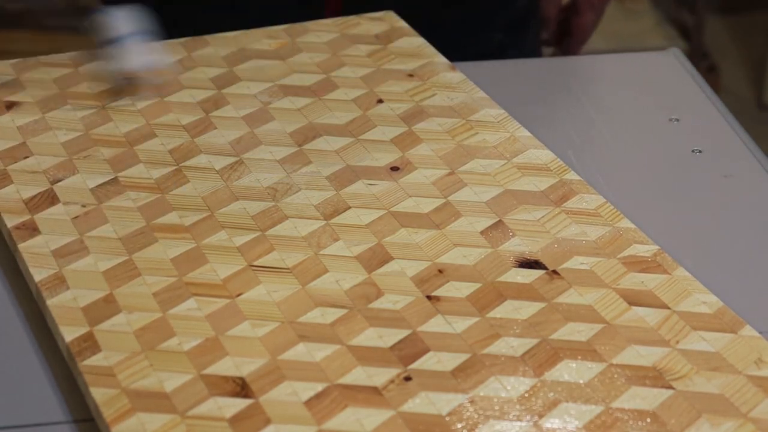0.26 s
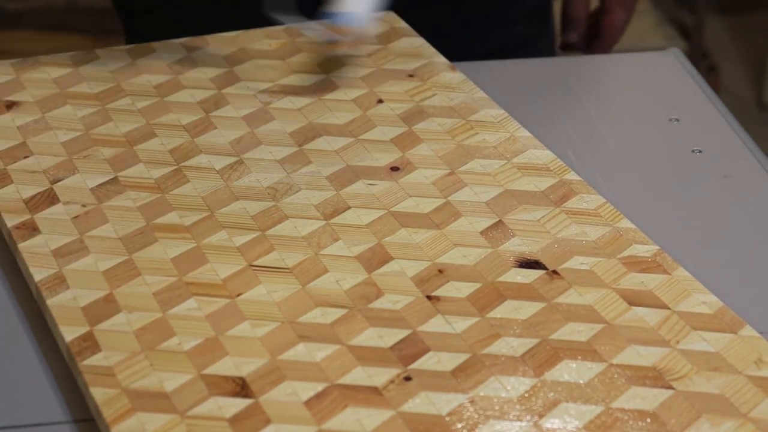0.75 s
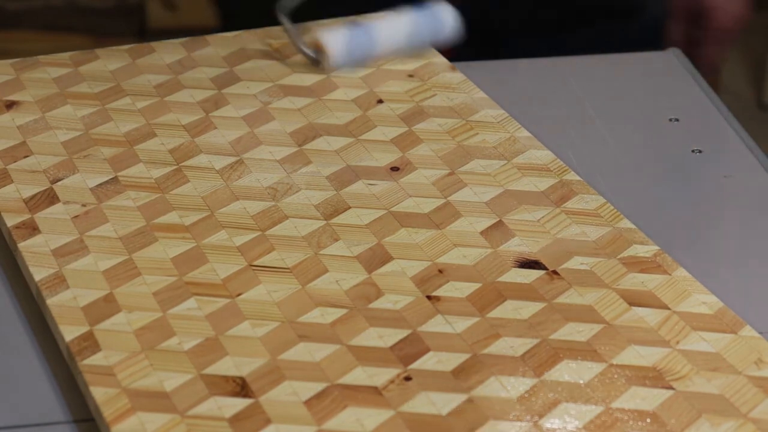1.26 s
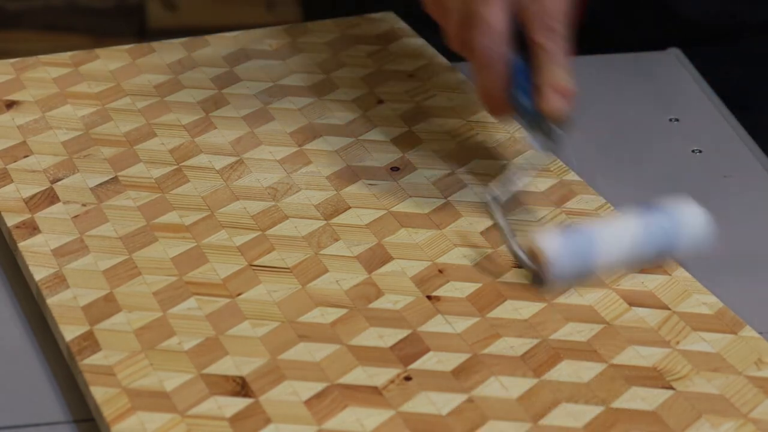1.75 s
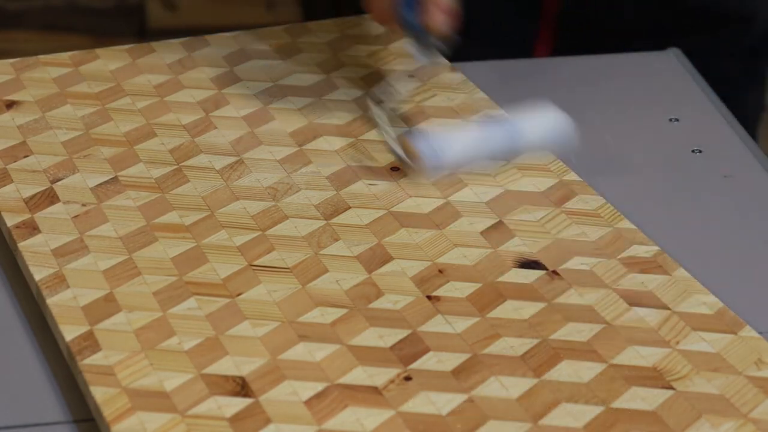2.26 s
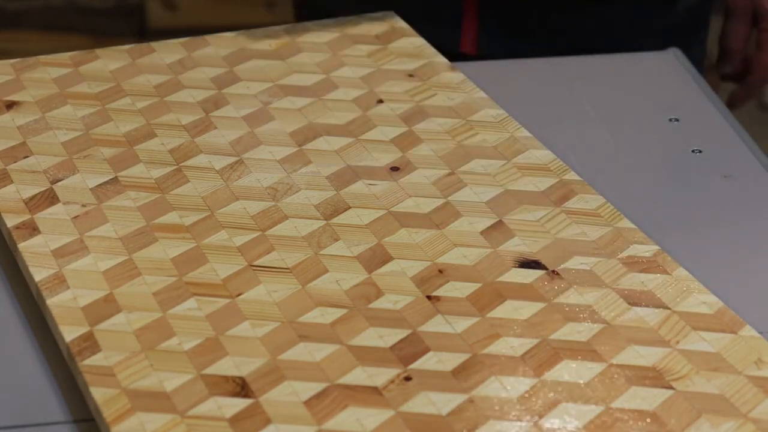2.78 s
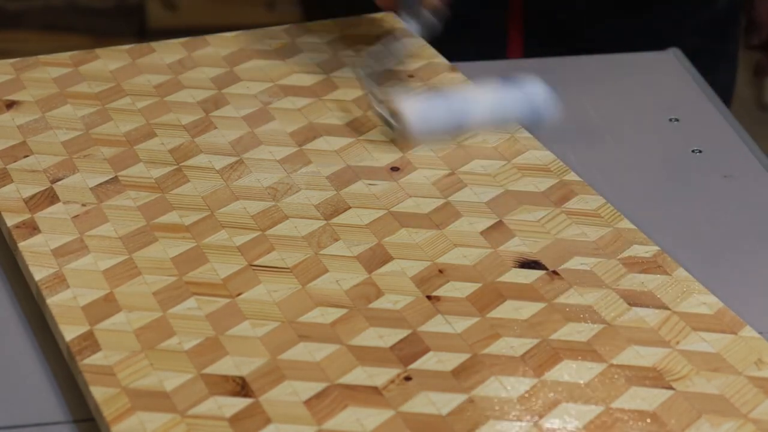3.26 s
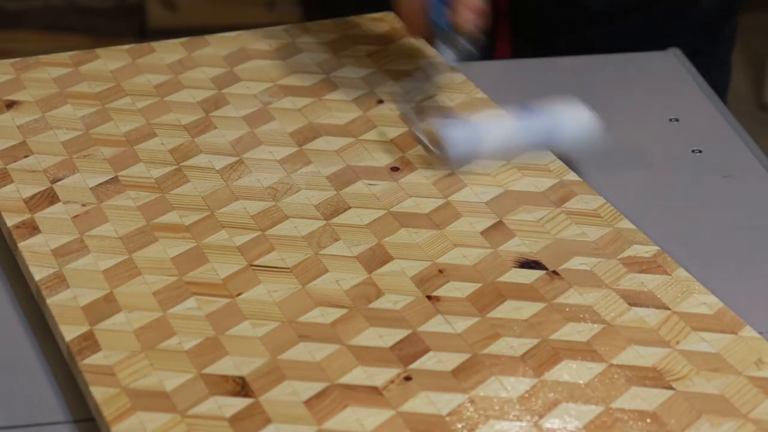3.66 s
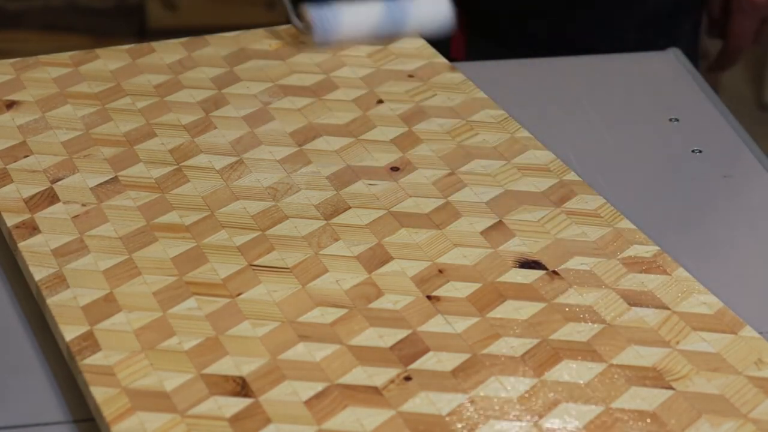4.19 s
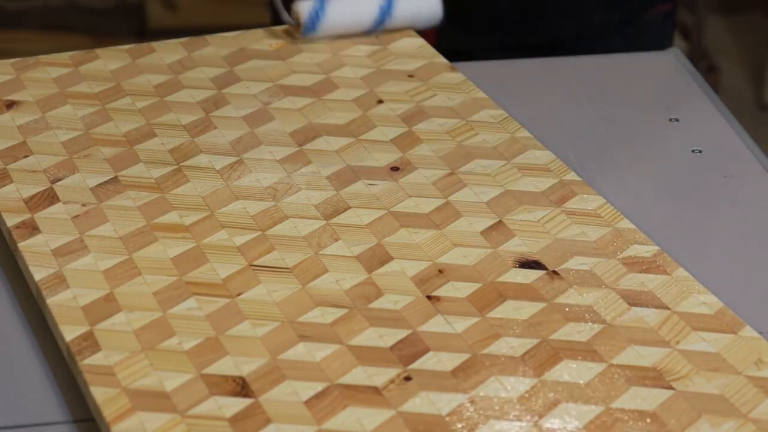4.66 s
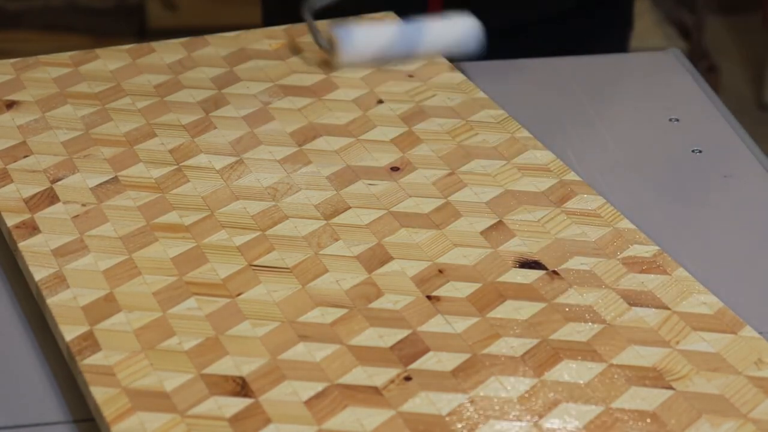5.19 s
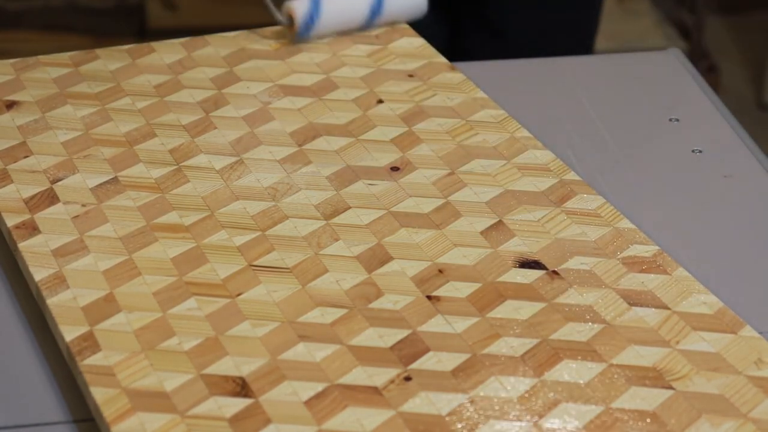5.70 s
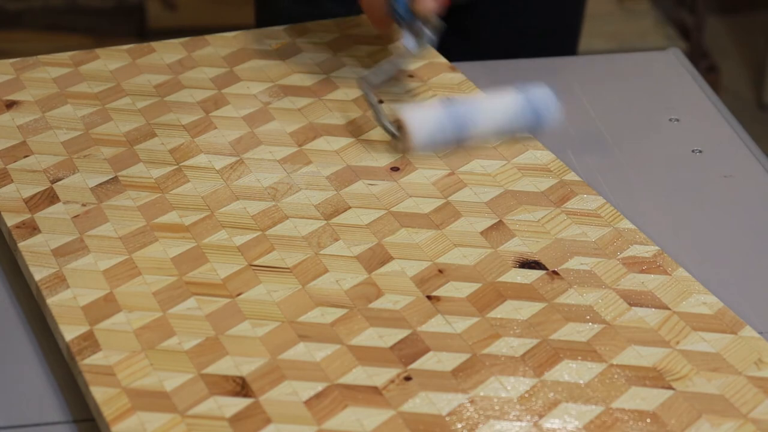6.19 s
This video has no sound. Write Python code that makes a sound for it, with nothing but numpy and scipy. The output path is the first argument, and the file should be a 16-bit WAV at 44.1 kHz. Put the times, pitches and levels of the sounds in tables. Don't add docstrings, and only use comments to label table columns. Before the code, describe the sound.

Sticky, fizzing roller strokes spread finish on wood, fading to softer rubs with metallic clicks and a dull board bump above a low drone.

```python
import sys
import numpy as np
from scipy import signal
from scipy.fft import rfft, irfft
from scipy.io import wavfile
from scipy.ndimage import uniform_filter1d, map_coordinates

SR = 44100
rng = np.random.default_rng(int(sys.argv[2]) if len(sys.argv) > 2 else 0)


def int16_out(signal):
    q = np.round(np.clip(np.atleast_2d(signal).T, -1, 1) * 32767)
    wavfile.write(sys.argv[1], SR, q.astype(np.int16))


def amplitude_ratio(level_db):
    exponent = np.asarray(level_db, float) / 20
    return 10 ** exponent


N = 284004
TIME = np.arange(N) / SR

# time_s, fan_db, floor_rumble_db
HUM_LEVELS = [(0.0, -33, -40), (0.7, -32, -46), (1.1, -32.5, -54), (2.4, -32.5, -47), (3.7, -32.5, -51),
              (4.4, -33.5, -54), (4.8, -33.5, -56), (5.0, -32, -46), (5.8, -32, -44), (6.44, -31.5, -41)]
# pitch_hz, level_db
FAN_COLOUR = [(24, -53), (40, -22.5), (85, -15), (150, -2.5), (198, 1), (360, -6.5), (408, -9.5),
              (451, -12), (930, -15.5), (1320, -25.5), (2170, -37.5), (3960, -52), (9250, -52),
              (14500, -50.5), (15600, -56)]
# pitch_hz, width_hz, level_over_wash_db
DUCT_RESONANCES = [(88, 68, -4.5), (137, 6.8, 9.5), (188.3, 29.4, 3.5), (330, 24, 2.5), (398, 9.1, 6),
                   (490, 6.8, 5.5), (565.6, 17, 2)]
# pitch_hz, level_db
RUMBLE_COLOUR = [(10, -16), (22, -10), (30, -4), (40, -13), (60, 11), (95, 18), (130, -18), (200, -46)]
# strongest_s, rise_s, fall_s, level_db
FLOOR_THUDS = [
    (3.12, 0.063, .3, -41),
    (3.73, 0.064, .12, -46),
    (5.03, 0.14, .3, -46),
    (5.95, .15, .4, -62),
]
# pitch_hz, level_db
THUD_COLOUR = [(10, -14), (22, 2), (35, 10), (60, -11), (95, 10), (130, -18), (200, -36)]
# pitch_hz, likeness_0_to_1
LIKENESS = [(25, .99), (60, .975), (290, .95), (640, .78), (1400, .4), (3000, .15), (15000, .05)]
# pitch_hz, left_minus_right_db
HUM_LEAN = [(60, -1.2), (700, -2), (2000, 0.5), (15000, -1)]
# pitch_hz, level_db
MOTOR_TONES = [(193.8, -45), (312.2, -46), (403.7, -44), (855.9, -75), (931.3, -59.5), (3343, -89)]
# fastest_s, speeding_up_s, slowing_down_s, peeling_fizz_db, rubbing_db
STROKES = [(0.042, .2, .15, -39.5, -34.5), (0.32, .2, .13, -42, -37.5), (0.5, .075, .265, -38, -35),
           (1.1, .6, .45, -65, -50), (1.72, .42, .345, -49.5, -49), (2.3, .22, .54, -47, -47.5),
           (3.048, .008, .06, -60, -46), (3.385, .285, .264, -49, -46.5), (3.80, .17, .39, -47.5, -47),
           (4.17, .12, .12, -64, -56), (4.385, .16, .16, -54, -50.5), (4.666, .137, .17, -51.5, -51.5),
           (4.97, .137, .09, -56, -51), (5.23, .23, .465, -49, -44), (5.70, .025, .07, -66, -54),
           (5.877, .09, .215, -61, -52), (6.372, .488, .324, -54.5, -52)]
# time_s, left_minus_right_db
ROLLER_PLACE = [(0, -7), (.55, -6.5), (1.15, -5.5), (1.4, -3.5), (2.15, -5), (2.7, -5), (4.2, -3),
                (6.44, -4)]
# time_s, delay_ms
LEFT_DELAY = [
    (0, 0.21),
    (1.15, 0.42),
    (1.3, 0.0046),
    (6.44, 0.01),
]
# pitch_hz, level_db
PEEL_FRONT = [(1500, -25), (3000, -6), (5000, -1), (7000, -2), (9500, -3), (12000, -4), (14500, -2),
              (16000, -8.5)]
# pitch_hz, level_db
PEEL_END = [(1500, -24), (3000, 0.5), (5000, 1.5), (7000, 1), (9500, -4.5), (12000, -6), (14500, -5),
            (16000, -8)]
# pitch_hz, level_db
RUB_COLOUR = [(400, -27), (900, -4.5), (1500, -0.5), (2400, -1.5), (3500, -2), (5000, -5.5), (7000, -14),
              (10000, -22)]
# start_s, tick_db, handle_knock_against_tick_db, tube_ring_db, ring_hz
CLICKS = [(1.2118, -18.5, -21, -32.5, 1037), (1.2161, -23, -20, -47, 1033), (2.3424, -27.5, -6, -38, 1035),
          (2.802, -29, -11, -49, 1100), (2.9008, -38, -10, -56, 960), (3.0455, -17, -15.5, -37, 910),
          (3.0498, -25, -17, -36, 975), (3.3586, -32, -2, -30.5, 965), (3.7668, -8, -17.5, -27, 978),
          (3.8734, -20.5, -14, -41, 1023), (3.8851, -22.5, -7.5, -32.5, 1005), (5.231, -15, -7.5, -50, 934),
          (5.2346, -23, -12, -50, 961)]
# pitch_factor, width_hz, level_against_tick_db
FRAME_BENDS = [(1.034, 503, 2.9), (1.282, 430, -2.5), (0.725, 406, -4), (1.14, 440, -2), (1.8, 1200, -9)]
# pitch_hz, time_to_fall_60_db_s
ROOM_DECAY = [(500, 0.21), (1500, 0.39), (4000, 0.37), (8000, 0.35), (15000, 0.059)]
# start_s, level_db, pitch_hz, width_hz, length_s
SCUFFS = [(1.569, -45, 1020, 60, .03), (1.644, -43, 1016, 50, 0.048), (1.72, -45.5, 1000, 50, 0.08),
          (2.362, -52, 1034, 60, 0.068), (1.88, -44, 1690, 2000, 0.062), (2.466, -45, 990, 150, 0.031),
          (3.466, -45, 930, 200, .04), (3.521, -45, 1470, 1500, 0.04), (3.543, -40.5, 2050, 3000, 0.034),
          (3.697, -45, 1500, 1500, 0.021), (4.882, -35.5, 540, 500, 0.094), (5.43, -40, 900, 2500, 0.05),
          (5.677, -50, 1874, 1800, 0.11), (2.79, -54.5, 2480, 2500, 0.054),
          (5.678, -55.5, 5100, 2500, 0.042), (5.848, -48.5, 3480, 4000, .04),
          (6.296, -47, 1030, 900, 0.059), (1.946, -49.5, 2800, 1500, 0.078), (5.959, -51, 1380, 1500, 0.13),
          (3.083, -39, 99, 60, 0.22), (3.096, -51, 35, 30, 0.21), (4.901, -37.5, 330, 403, 0.19),
          (5.7, -38, 137, 24.6, 0.65), (6.119, -37.5, 249, 50, 0.31)]
# start_s, level_db
BUMPS = [
    (4.877, -31),
    (4.884, -19.5),
    (4.903, -28),
    (5.432, -30),
]
# pitch_hz, level_db, time_to_fall_60_db_s
BOARD_MODES = [(444, 0, 0.099), (519, 5, 0.092), (600, 0.5, 0.059), (718, -12, 0.056), (826, -7, 0.059)]


def evened(x):
    return x / np.sqrt(np.mean(x ** 2) + 1e-20)


def read(points, hz):
    f, value = np.transpose(points)
    return np.interp(np.log(hz + 1), np.log(f + 1), value)


def curves(rows):
    s, *columns = np.transpose(rows)
    return [np.interp(TIME, s, column) for column in columns]


def add(mix, s, sound):
    part = mix[..., round(s * SR):][..., :sound.shape[-1]]
    part += sound[..., :part.shape[-1]]


def pan(x, db):
    return np.array([x * amplitude_ratio(db / 2), x / amplitude_ratio(db / 2)])


def wander(hz):
    lead = rng.standard_normal(N + SR)
    lowpass = signal.butter(2, hz, fs=SR, output="sos")
    return evened(signal.sosfilt(lowpass, lead)[SR:])


def mode(t, hz, width):
    return np.exp(-np.pi * width * t) * np.sin(2 * np.pi * hz * t)


def arches(rows, column, slope_db, rest_db):
    power = np.full(N, amplitude_ratio(rest_db) ** 2)
    for row in rows:
        peak_s, rise_s, fall_s = row[:3]
        phase = np.clip((TIME - peak_s) / np.where(TIME < peak_s, rise_s, fall_s), -1, 1)
        speed = np.maximum(np.cos(np.pi / 2 * phase), 0)
        power += amplitude_ratio(row[column]) ** 2 * speed ** (slope_db / 10)
    return 10 * np.log10(power)


def standing(hz, depth_db, width_hz):
    bins = max(round(width_hz / hz[1]), 1)
    ripple = uniform_filter1d(rng.standard_normal(len(hz)), bins)
    return depth_db * evened(uniform_filter1d(ripple, bins))


def coloured(x, points, lo_hz, hi_hz):
    hz = np.fft.rfftfreq(len(x), 1 / SR)
    z = rfft(x) * amplitude_ratio(read(points, hz) + standing(hz, 2.5, 14.0))
    band = z[(hz > lo_hz) & (hz < hi_hz)]
    inside = np.sqrt(2 * np.sum(abs(band) ** 2)) / len(x)
    return irfft(z, len(x)) / inside


def hum():
    frames, hz = N // 1024 + 6, np.fft.rfftfreq(4096, 1 / SR)
    a, b, c, d = rng.standard_normal((frames, len(hz), 4)).T
    same = np.clip(read(LIKENESS, hz), -1, 1)[:, None]
    left = a + 1j * b
    right = same * left + np.sqrt(1 - same ** 2) * (c + 1j * d)
    noise = np.array([left, right]) * pan(1, read(HUM_LEAN, hz))[:, :, None]

    def wash(db):
        sound = signal.istft(noise * amplitude_ratio(db)[:, None], nperseg=4096, noverlap=3072)[1]
        return evened(sound[:, :N])

    fan_db = read(FAN_COLOUR, hz) + standing(hz, 2.44, 15.)
    fan_db += sum(db / (1 + (2 * (hz - f) / width) ** 2) for f, width, db in DUCT_RESONANCES)
    fan_level_db, rumble_db = curves(HUM_LEVELS)
    thud_db = arches(FLOOR_THUDS, column=3, slope_db=40., rest_db=-90.)
    fan = amplitude_ratio(fan_level_db) * wash(fan_db)
    rumble = amplitude_ratio(rumble_db - 12.0) * wash(read(RUMBLE_COLOUR, hz))
    thuds = amplitude_ratio(thud_db) * wash(read(THUD_COLOUR, hz))
    return fan + rumble + thuds


def tones():
    out = np.zeros(N)
    for hz, db in MOTOR_TONES:
        turns = np.cumsum(hz + 2.185 * wander(hz=2.55)) / SR
        out += amplitude_ratio(db + 1.8 * wander(hz=4.1)) * np.sin(2 * np.pi * turns)
    return pan(out, -1.6)


def snaps(per_s, spread_db):
    size = amplitude_ratio(spread_db * np.minimum(rng.exponential(1, N), 5)) * rng.standard_normal(N)
    return size * (rng.random(N) < per_s / SR)


def film(aside):
    threads = snaps(18000., 2.7)
    front = coloured(threads, PEEL_FRONT, 7200, 16200)
    end = coloured(threads, PEEL_END, 6960, 16600)
    return (1 - aside) * front + aside * end


def lingering(db, t60):
    r = 10 ** (-6 / (t60 * SR))
    power = amplitude_ratio(db) ** 2
    return np.sqrt(signal.lfilter([1 - r], [1, -r], power, zi=[r * power[0]])[0])


def roller():
    peel_db = arches(STROKES, column=3, slope_db=20.5, rest_db=-77.) + .8 * wander(hz=20.)
    rub_db = arches(STROKES, column=4, slope_db=16., rest_db=-60.) + 1.1 * wander(hz=20.)
    side_db = curves(ROLLER_PLACE)[0]
    late_ms = curves(LEFT_DELAY)[0]
    aside = np.clip(late_ms / .19, 0, 1)
    peel = [film(aside) for _ in range(3)]
    rub = [coloured(snaps(9000., 1.0), RUB_COLOUR, 1920, 4700) for _ in range(3)]
    sound = amplitude_ratio(peel_db - 3.5) * peel[0] + amplitude_ratio(rub_db - 5.5) * rub[0]
    heard_at = np.arange(N) - late_ms * SR / 1000
    direct = np.array([map_coordinates(sound, [heard_at], order=5, mode="nearest"), sound])
    scattered = lingering(peel_db - 0.5, 0.02) * peel[1:]
    scattered = scattered + lingering(rub_db - 0.57, 0.22) * rub[1:]
    return pan(1, side_db) * (direct + scattered)


def room(x, start_s, shrink):
    taps = np.zeros((2, SR // 2))
    starts = np.arange(int(start_s * SR), SR // 2 - 20, 10)
    at = starts + rng.integers(0, 10, (2, len(starts)))
    np.put_along_axis(taps, at, rng.choice([-1., 1.], (2, len(starts))), 1)
    hz, t, z = signal.stft(taps, SR, nperseg=256)
    fade = amplitude_ratio(-60 * t / (shrink * read(ROOM_DECAY, hz)[:, None]))
    tail = signal.istft(z * fade, SR, nperseg=256)[1]
    tail[:, :starts[0]] = 0
    return signal.fftconvolve(x, tail / np.linalg.norm(tail[0]), axes=1)[:, :N]


def clicks():
    ticks, rings = np.zeros((2, N)), np.zeros((2, N))
    t = np.arange(6000) / SR
    contact = 1 - np.exp(-(t / 0.00046) ** 2)
    handle = mode(t, 1680., 420.)
    for s, tick_db, handle_db, ring_db, ring_hz in CLICKS:
        tick_hz = 4316 - 32.5 * (handle_db + 25)
        tick = sum(amplitude_ratio(db) * mode(t, k * tick_hz, width) for k, width, db in FRAME_BENDS)
        knock = contact * (tick + amplitude_ratio(handle_db + 9.0) * handle)
        add(ticks, s, pan(amplitude_ratio(tick_db + 2.5) * knock, -4.0))
        ring = mode(t, ring_hz, 13.) + .5 * mode(t, .973 * ring_hz, 12.)
        ring *= 1 - np.exp(-t / .0015)
        add(rings, s, pan(amplitude_ratio(ring_db + 0.2) * ring, -2.5))
    return ticks + rings + amplitude_ratio(-3.5) * room(ticks + .3 * rings, .003, 1.)


def scuffs():
    out, t = np.zeros((2, N)), np.arange(SR // 2) / SR
    for s, db, hz, width, length in SCUFFS:
        noise = rng.standard_normal(len(t))
        body = mode(t, hz, width) * t
        puff = evened(signal.fftconvolve(noise, body)[:len(t)])
        swell = (1 - np.exp(-t / (.12 * length))) * np.exp(-t / (.5 * length))
        add(out, s, pan(amplitude_ratio(db) * puff * swell, -3.0))
    highpass = signal.butter(2, 500., "high", fs=SR, output="sos")
    bright = signal.sosfilt(highpass, out)
    return amplitude_ratio(7.0) * out + amplitude_ratio(1.) * room(bright, 0.003, 0.5)


def bumps():
    out, t = np.zeros((2, N)), np.arange(8000) / SR
    board = sum(amplitude_ratio(db - 60 * t / t60) * np.sin(2 * np.pi * hz * t) for hz, db, t60 in BOARD_MODES)
    board *= 1 - np.exp(-t / 0.0027)
    for s, db in BUMPS:
        add(out, s, pan(amplitude_ratio(db - 6.5) * board, -2.5))
    return out + amplitude_ratio(-9.0) * room(out, 0.0038, 0.72)


def scene():
    return hum() + tones() + roller() + clicks() + scuffs() + bumps()


def top_cut(x):
    return signal.sosfilt(signal.butter(12, 15770, fs=SR, output="sos"), x)


def record(dry):
    edge = signal.firwin(801, 15780, window=("kaiser", 9), fs=SR)
    mix = signal.oaconvolve(dry, edge[None], "same")
    return top_cut(mix)


dry = scene()
out = record(dry)
int16_out(out)
```